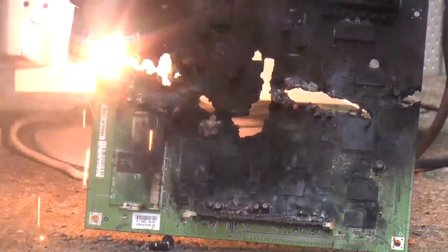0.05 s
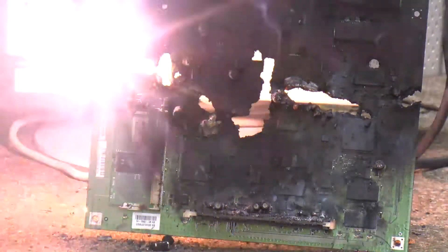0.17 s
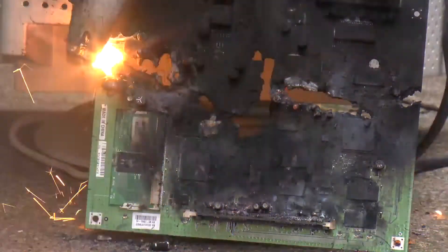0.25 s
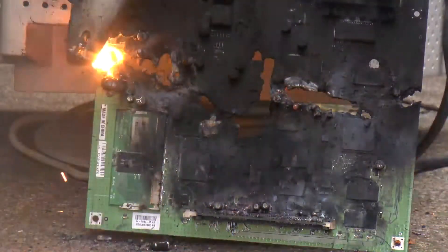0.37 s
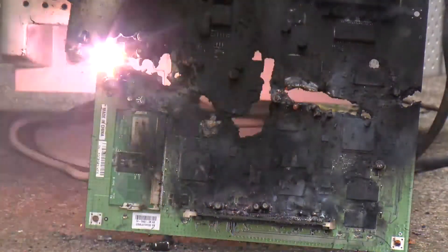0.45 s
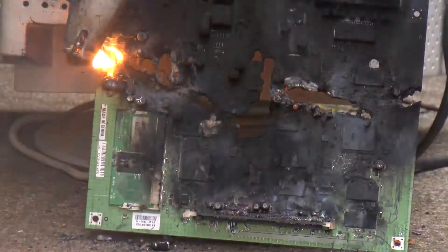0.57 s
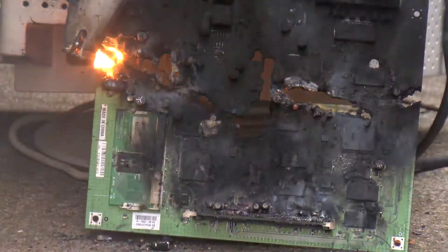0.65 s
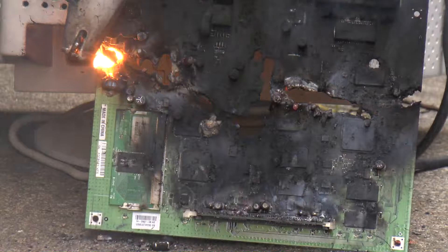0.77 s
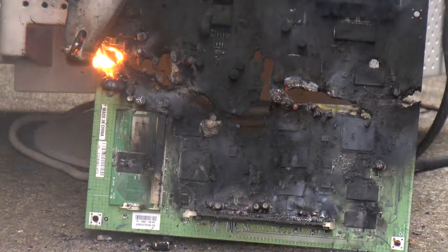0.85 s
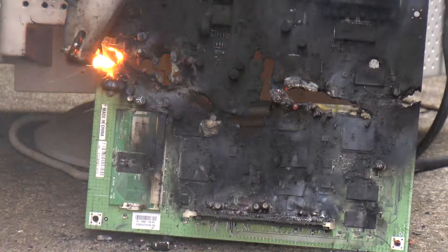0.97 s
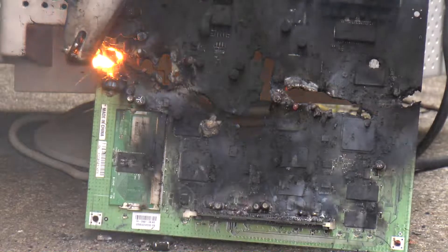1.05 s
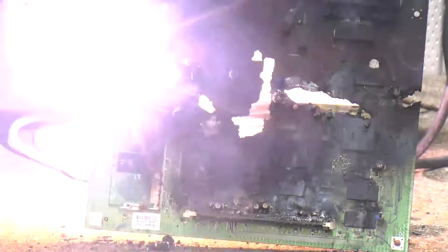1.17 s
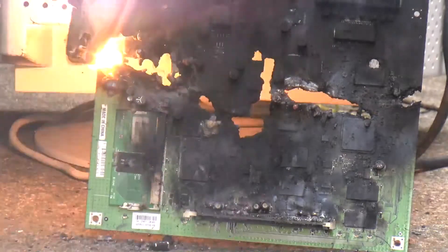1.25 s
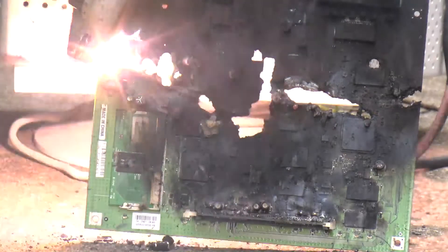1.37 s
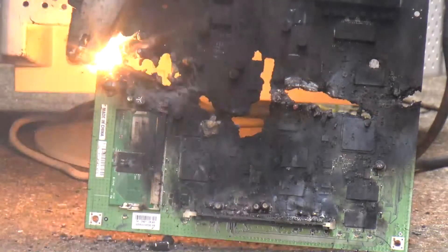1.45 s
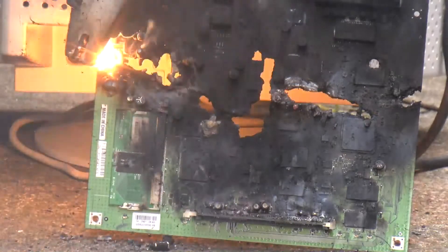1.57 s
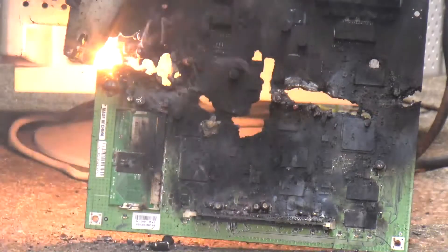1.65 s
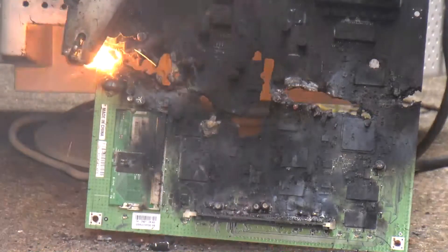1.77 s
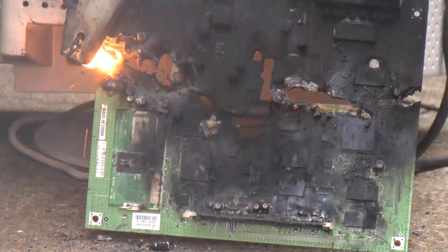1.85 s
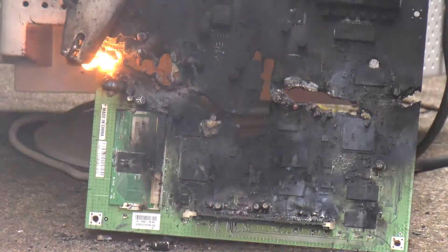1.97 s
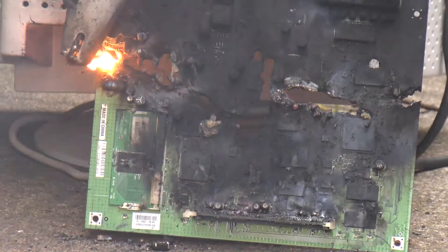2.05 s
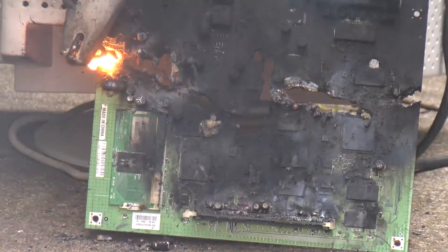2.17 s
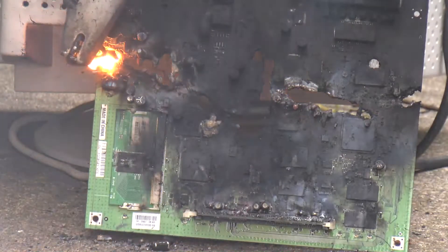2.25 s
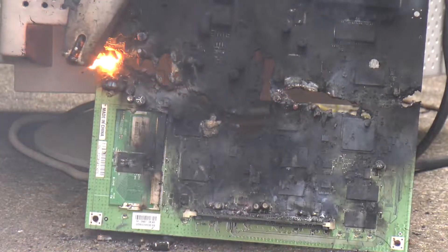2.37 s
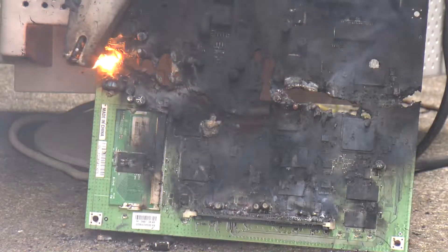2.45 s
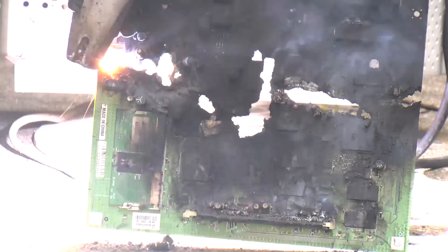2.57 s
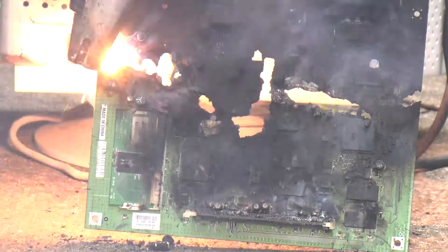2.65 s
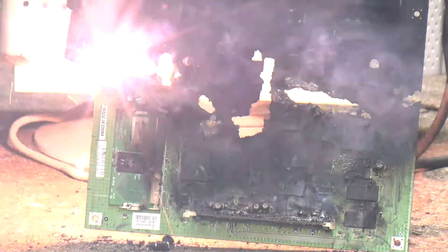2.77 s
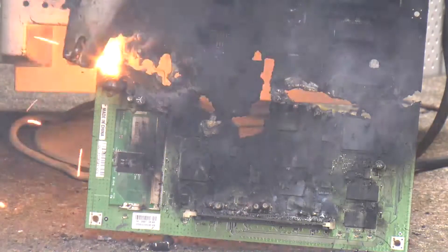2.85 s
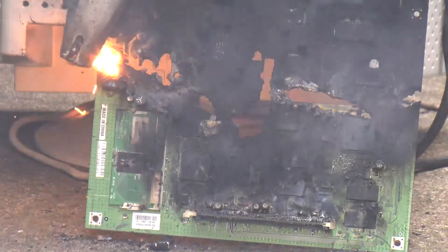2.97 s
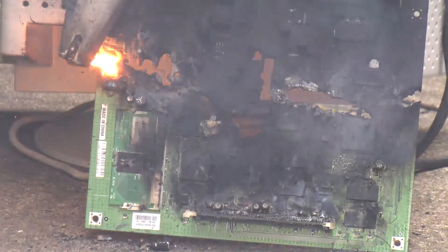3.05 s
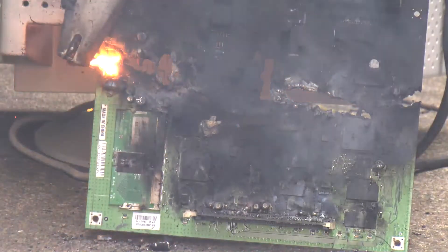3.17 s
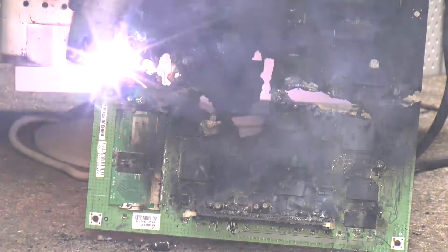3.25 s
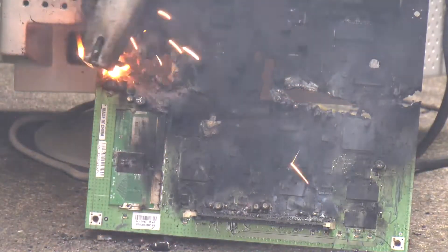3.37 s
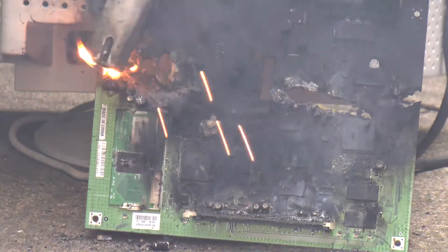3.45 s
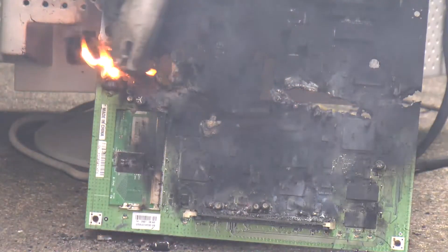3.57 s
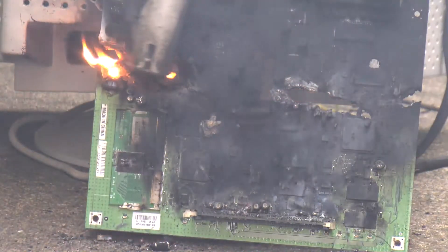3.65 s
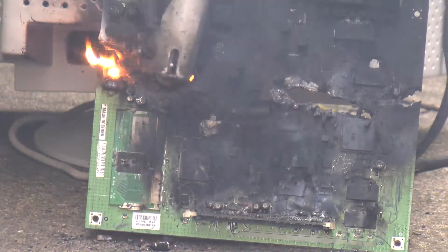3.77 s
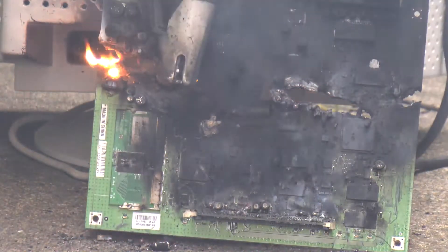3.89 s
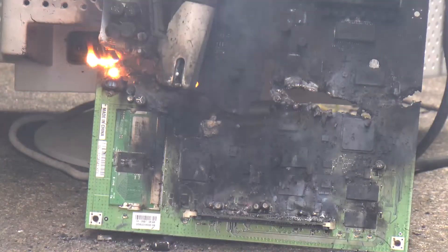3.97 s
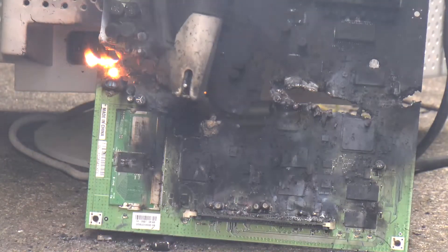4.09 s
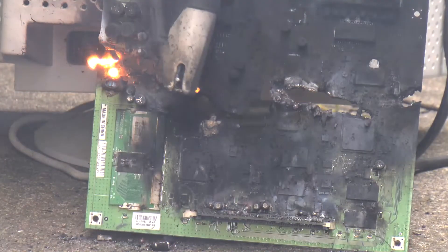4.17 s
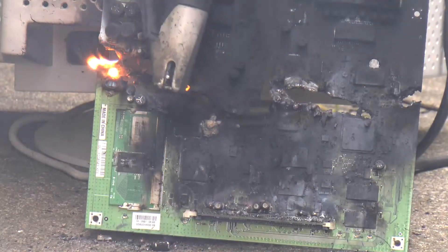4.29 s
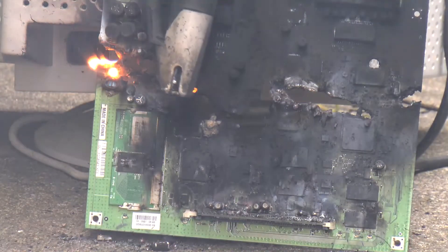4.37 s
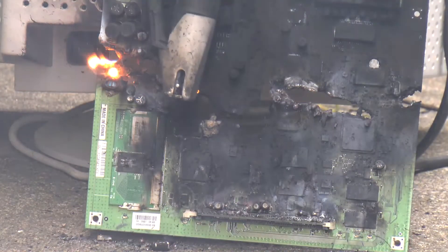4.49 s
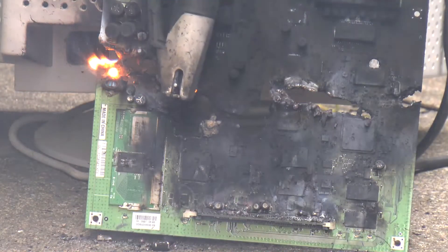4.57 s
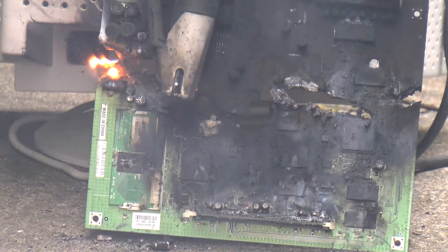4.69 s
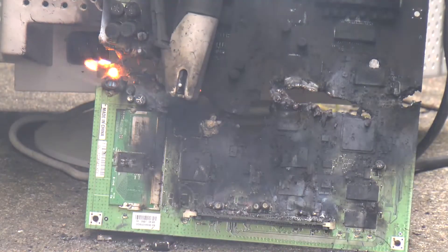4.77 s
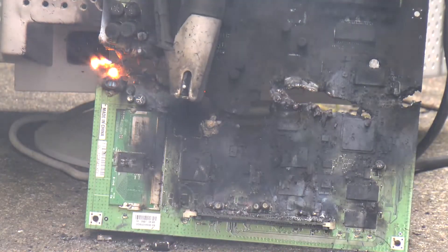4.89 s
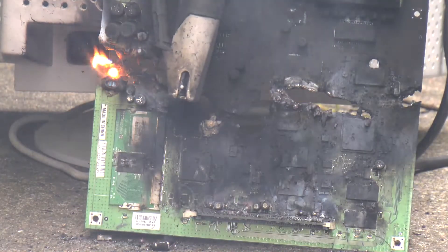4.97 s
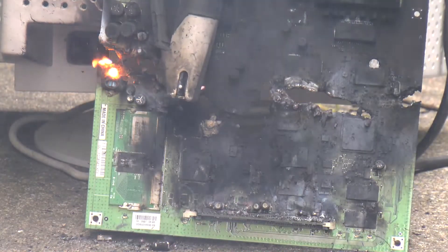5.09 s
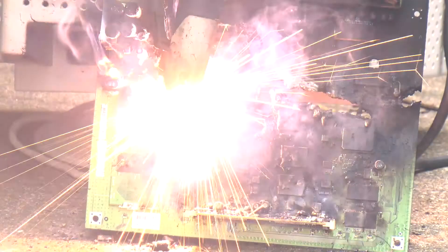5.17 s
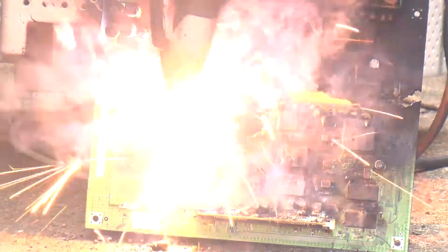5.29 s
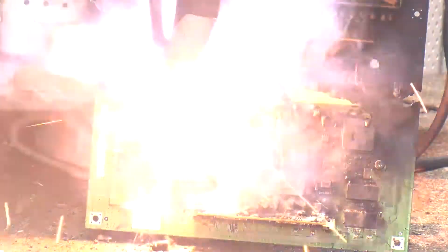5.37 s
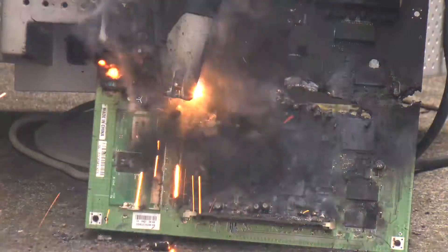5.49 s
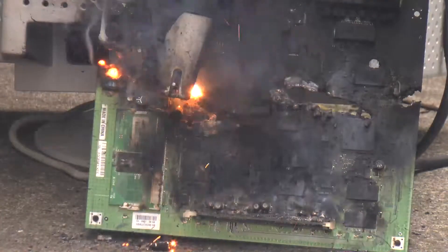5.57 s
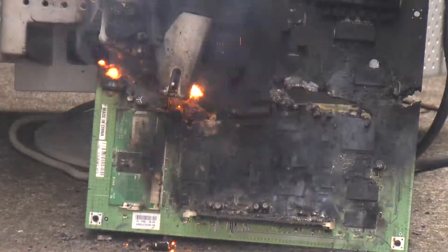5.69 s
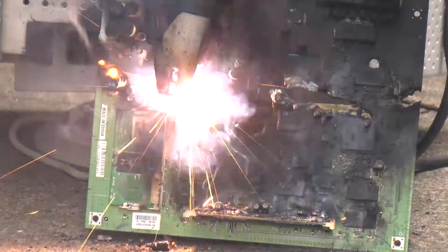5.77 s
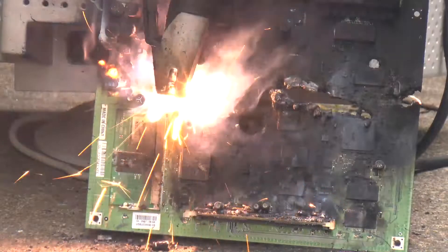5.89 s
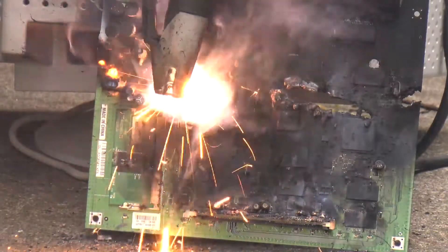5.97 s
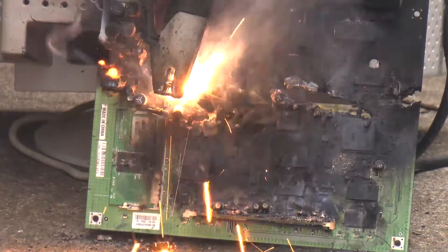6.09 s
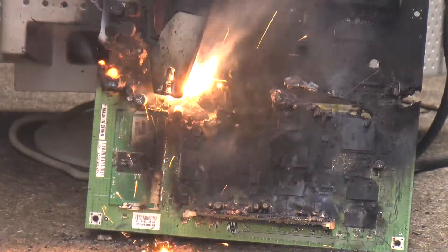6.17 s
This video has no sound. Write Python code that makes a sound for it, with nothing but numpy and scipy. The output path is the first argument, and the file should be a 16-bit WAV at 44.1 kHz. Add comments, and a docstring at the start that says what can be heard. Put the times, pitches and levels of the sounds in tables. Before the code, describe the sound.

Close stereo sound in a workshop with a short reverberant tail. Throughout, a fan rushes softly with a wavering transformer hum, faint whirr and the muffled rush of burning resin. At 0 s an electric arc cracks and buzzes for about 0.3 s, grainy and mains-pulsed; a small pop and tick follow near 0.4 s, then a faint high rising squeak. From 1.2 to 1.8 s it relights, sizzling and sputtering with moderate cracks. At 2.65 s a hard double crack starts another buzzing burst to 2.9 s; a sharp short snap hits at 3.3 s. A low drone swells from about 3 s and stays through the lull, with a small tick at 3.7 s and a tiny squeak at 5 s. The flame rush grows. At 5.2-5.5 s comes the loudest volley of cracks, thumps and metallic ringing, then another from 5.8 s to the end.

```python
"""A welding arc buzzes and sizzles close by in a workshop, burning into a circuit board in several bursts.
Relighting on each half cycle of the mains pulses its grainy noise and drives a buzz of harmonics.
Bursts of vapour crack as steep noise fronts, thump as short booms and set metal modes ringing.
Fan noise, transformer hum and a soft rush of burning resin run throughout; the hot board ticks, gas squeaks
as gliding tones, and a low drone swells in midway."""
import sys
import numpy as np
from scipy import signal
from scipy.fft import rfft, irfft, next_fast_len
from scipy.io import wavfile

SR = 44100
rng = np.random.default_rng(int(sys.argv[2]) if len(sys.argv) > 2 else 0)


def master_out(mix):
    """Clip the mix to full scale and print it as 16-bit PCM to the path in sys.argv[1]."""
    frames = np.transpose(np.atleast_2d(mix))
    ceiling = np.clip(frames, -1, 1)
    pcm = np.round(ceiling * 32767).astype(np.int16)
    wavfile.write(sys.argv[1], SR, pcm)


N = 274743
TIME = np.arange(N) / SR
STRIKE_HZ = 100  # the arc relights on each half cycle of the mains
SAG_DB_PER_S = 6  # the arc weakens as the electrode burns back

# The burns of the arc. Each row: start in seconds, length in seconds, relative sizzle level in dB,
# relative buzz level in dB, time for the sizzle to fall 60 dB in seconds.
BURNS = [(0, .3, -43.5, -38, 0.21), (1.187, 0.38, -46, -38.5, 0.7), (1.643, 0.125, -52.5, -49, 0.5),
         (2.645, .238, -50, -35.5, 1.08), (3.325, 0.02, -45, -41, 0.079), (5.24, 0.24, -39.5, -34.5, 0.11),
         (5.794, 0.47, -46.5, -39, .15)]
# The large bursts of vapour. Each row: start in seconds, relative crack level in dB,
# relative thump level in dB, treble tilt in dB.
VAPOUR_BURSTS = [(0.0109, -16.5, -24, 2.5), (0.391, -18, -24, 6.5), (1.24, -20, -28, 0),
                 (1.3102, -25.5, -39, 3), (1.3583, -38, -31.5, -3), (1.4487, -21, -27, -1.5),
                 (1.5078, -31, -25.5, -3), (1.7481, -23.5, -24.5, 8), (2.6465, -5.5, -18.5, -3),
                 (2.6581, -3.5, -15.5, -4.5), (2.7459, -23, -19.5, -3), (2.756, -14.5, -19, 0.5),
                 (2.866, -32, -30.5, -4), (3.3358, -5.5, -14.5, 4.5), (3.3452, -7.5, -23.5, 1),
                 (5.2322, -2, -12.5, -4.5), (5.241, -4, -41, -3.5), (5.252, -6.5, -16.5, -1),
                 (5.292, -10, -28, -7), (5.3021, -10.5, -21.5, -12), (5.3227, -19.5, -21, -19),
                 (5.353, -9, -17.5, 6), (5.4113, -9.5, -20, -1.5), (5.4221, -8.5, -20.5, -12.5),
                 (5.432, -6, -22, 5), (5.473, -10.5, -16, 2.5), (5.7916, -11.5, -21, 10),
                 (5.8105, -4, -18.5, -1), (5.8509, -11.5, -24, 7), (5.892, -13, -22.5, 6.5),
                 (5.9706, -16, -19, 0), (5.9801, -11.5, -23, -0.5), (6.0, -16, -21, -1),
                 (6.0306, -9.5, -21.5, 1.5)]


def gain_of(db):
    """Decibels to gain."""
    return 10 ** (np.asarray(db) / 20)


def evened(x):
    """Scaled to an rms of one."""
    return x / np.sqrt(np.mean(x ** 2) + 1e-20)


def unit(x):
    """Scaled to an energy of one."""
    return x / np.sqrt(np.sum(x ** 2) + 1e-20)


def read(points, hz):
    """A table's value, interpolated on a log-frequency axis."""
    f, value = np.transpose(points)
    return np.interp(np.log(hz + 1), np.log(f + 1), value)


def add(mix, s, sound):
    """Mixes a sound in at time s, cut at the end of the mix."""
    part = mix[..., max(round(s * SR), 0):][..., :sound.shape[-1]]
    part += sound[..., :part.shape[-1]]


def colour(x, spectrum):
    """A causal minimum-phase filter with the given spectrum, so that attacks stay sharp."""
    hz = abs(np.fft.fftfreq(4096, 1 / SR))
    log_gain = np.log(gain_of(np.maximum(read(spectrum, hz), -100)))
    response = np.exp(np.conj(signal.hilbert(log_gain)))
    taps = np.fft.ifft(response).real[:2048]
    return signal.oaconvolve(x, taps)[:len(x)]


def wander(hz):
    """Slow chance of unit rms: noise rolled off above the given rate."""
    size = next_fast_len(N, real=True)
    rolloff = 1 + (np.fft.rfftfreq(size, 1 / SR) / hz) ** 4
    return evened(irfft(rfft(rng.standard_normal(size)) / rolloff, size)[:N])


def wide_noise(spectrum):
    """Noise from all around, as two microphone ports hear it: partly alike, band by band."""
    # Each row: frequency in Hz, likeness of left and right from 0 to 1.
    likeness = [(60, 0.66), (130, 0.8), (290, 0.62), (640, 0.52), (1410, 0.29), (3100, 0.84), (6820, 1),
                (15000, 0.14)]
    hz = np.fft.rfftfreq(N, 1 / SR)
    mid, side = rfft(rng.standard_normal((2, N)))
    same = np.clip(read(likeness, hz), -1, 1)
    mid, side = mid * np.sqrt(1 + same), side * np.sqrt(1 - same)
    ports = np.array([mid + side, mid - side])
    return evened(irfft(ports * gain_of(read(spectrum, hz)), N))


def envelope(start, length, rise_s, fade_s):
    """Attack, hold and a release that falls 60 dB in fade_s."""
    t = TIME - start
    release_db = -60 * np.maximum(t - length, 0) / fade_s
    return np.clip(t / rise_s, 0, 1) * gain_of(release_db)


def arc_strength(ignite_s=0.0017, buzz_out_s=0.042, spatter_db=-21, spatter_fade_db_per_s=435):
    """Gains of sizzle and buzz: each burn lights, sags and goes out; each large burst adds spatter."""
    sizzle_power, buzz = np.zeros(N), np.zeros(N)
    for start, length, sizzle_db, buzz_db, fade_s in BURNS:
        sag_db = SAG_DB_PER_S * np.clip(TIME - start, 0, length)
        sizzle = gain_of(sizzle_db - sag_db) * envelope(start, length, ignite_s, fade_s)
        sizzle_power += sizzle ** 2
        buzz += gain_of(buzz_db - sag_db) * envelope(start, length, ignite_s, buzz_out_s)
    t = np.arange(SR // 2) / SR
    for s, crack_db, _, _ in VAPOUR_BURSTS:
        # the sizzle flares, in proportion to the burst's crack
        flare = np.minimum(t / ignite_s, 1) * gain_of(crack_db + spatter_db - spatter_fade_db_per_s * t)
        add(sizzle_power, s, flare ** 2)
    return np.sqrt(sizzle_power), buzz


def arc(sizzle_db=-2, buzz_db=-1, pulsing=0.22, grain_db=5.5, flicker_db=1.5, waver_db=2.2,
        strike_s=0.00184, boom_lag_s=0.00516):
    """The plasma sizzles in grains on every half cycle, and its heat pulses the air into a buzz."""
    # The sizzle's spectrum. Each row: frequency in Hz, level in dB per Hz.
    sizzle_spectrum = [(530, -16.5), (900, -19), (1100, 0), (1320, -9), (1950, -2), (2280, -7),
                       (2900, -1.5), (4180, -4.5), (5600, -1.5), (7500, -9.5), (8050, -10), (14300, -19),
                       (15500, -14)]
    # The buzz's harmonics. Each row: multiple of the strike rate, relative level in dB.
    harmonics = [(1, -9), (2, -1), (3, -7), (4, -9)]
    sizzle_gain, buzz_gain = arc_strength()
    turns = STRIKE_HZ * (TIME - strike_s) + 0.03 * wander(34)  # cycles, slightly unsteady
    grain_size = np.minimum(rng.exponential(1, N), 4.5)
    grains = rng.standard_normal(N) * gain_of(grain_db * grain_size)
    grains *= 1 + pulsing * np.cos(2 * np.pi * turns)
    grains *= gain_of(flicker_db * wander(57))
    sizzle = evened(colour(grains, sizzle_spectrum)) * sizzle_gain
    pulse = 2 * np.pi * (turns - STRIKE_HZ * boom_lag_s)
    buzz = sum(gain_of(db + waver_db * wander(45)) * np.cos(round(k) * pulse) for k, db in harmonics)
    return gain_of(sizzle_db) * sizzle, gain_of(buzz_db) * evened(buzz) * buzz_gain


def welder(fan_db=-43.5, hum_hz=399.7, hum_db=-53, whirr_hz=236, whirr_db=-54,
           drone_hz=54, drone_db=-55.0, drone_waver_db=2, drone_start_s=2.95, drone_rise_s=0.52):
    """The fan rushes and whirrs over a wavering transformer hum; a low drone swells in and stays."""
    # The fan's rush of air. Each row: frequency in Hz, level in dB per Hz.
    fan_spectrum = [(25, -20), (50, -15), (90, -5), (160, -5.5), (250, -1.5), (400, -7), (590, -12.5),
                    (790, -6.5), (1320, -22.5), (2000, -21), (3200, -23.5), (6000, -33.5), (9000, -42),
                    (14000, -43)]
    hum_tone = np.sin(2 * np.pi * hum_hz * TIME + 0.14 * wander(24.0))
    hum = gain_of(hum_db + 2 * wander(13.0)) * evened(hum_tone)
    whirr_tone = wander(9.1) * np.sin(2 * np.pi * whirr_hz * TIME + wander(2.6))
    whirr = gain_of(whirr_db) * evened(whirr_tone)
    swell = np.clip((TIME - drone_start_s) / drone_rise_s, 0, 1)
    swell = swell * gain_of(drone_db + drone_waver_db * wander(1.8))
    drone = swell * evened(np.sin(2 * np.pi * drone_hz * TIME + 2.5 * wander(5.4)))
    fan = gain_of(fan_db + .5 * wander(35)) * wide_noise(fan_spectrum)
    return fan + hum + whirr + drone


def flame(flicker_db=0.9):
    """The burning resin rushes softly as broad noise, louder and softer as the fire spreads and sinks."""
    # The fire on the board. Each row: time in seconds, level of the rush in dB.
    fire = [(0.0, -49), (1.15, -51), (1.4, -48), (2.5, -52.5), (2.9, -49.5), (5.1, -44), (6.23, -46)]
    # The rush's spectrum. Each row: frequency in Hz, level in dB per Hz.
    rush_spectrum = [(150, -6), (300, 11.5), (500, 6), (800, 7), (1300, 5), (2200, -2), (3300, -12),
                     (5000, -30), (9000, -39)]
    level_db = np.interp(TIME, *np.transpose(fire)) + flicker_db * wander(15)
    return gain_of(level_db) * wide_noise(rush_spectrum)


def crack(front=0.39, ragged_db=3.5, rise_s=.00065):
    """A steep front followed by a ragged spray that swells and dies within a few milliseconds."""
    # The crack's spectrum. Each row: frequency in Hz, level in dB per Hz.
    crack_spectrum = [(180, -15), (450, 0), (780, -1), (1150, 4), (1600, -6), (2400, -0.5), (3300, -2),
                      (4300, -4), (5600, -1.5), (7500, -10.5), (11000, -17.5), (15500, -16)]
    u = np.arange(4096) / SR / rise_s
    ragged = rng.standard_normal(len(u)) * gain_of(ragged_db * rng.standard_normal(len(u)))
    spray = unit(ragged * u * np.exp(-u))
    spray[0] += front
    return unit(colour(spray, crack_spectrum))


def sputter(per_s=13, spread_db=3, crack_db=15.5, thump_db=3):
    """Small bursts of vapour at chance strikes of the arc, as rows like the large ones."""
    rows = []
    for start, length, sizzle_db, buzz_db, _ in BURNS:
        count = int(length * per_s)
        for k, (place, a, b) in enumerate(rng.uniform(-1, 1, (12, 3))[:count]):
            s = start + length * (k + .5 + place / 2) / count
            s = round(s * STRIKE_HZ) / STRIKE_HZ  # onto the grid of strikes
            sag_db = SAG_DB_PER_S * (s - start)
            # levels follow the sizzle and the buzz of that burn
            rows.append((s, sizzle_db - sag_db + crack_db + spread_db * a,
                         buzz_db - sag_db + thump_db + spread_db * b, 0))
    return rows


def pops(crack_db=8, thump_db=7, boom_delay_s=0.00547):
    """Each burst of vapour cracks, pushes the air into a boom and sets the metal ringing."""
    # The air around the bench booms. Each row: frequency in Hz, rise in seconds, relative level in dB.
    air_modes = [(114.3, 0.0097, -18.5), (198, 0.0076, -6.5), (358.6, 0.0022, -12)]
    # Metal of torch and board. Each row: frequency in Hz, time to fall 60 dB in seconds,
    # relative level in dB.
    metal_modes = [(1970, 0.093, -4.5), (2170, 0.088, 5), (2433, 0.13, -2), (2590, 0.19, -6),
                   (3225, 0.037, 8), (3340, 0.065, 6), (4030, 0.052, -9), (5330, 0.078, -5),
                   (5400, .07, -17), (5825, .09, -10), (8000, 0.15, -10)]
    # The torch moves to a spot where bare metal rings. Each row: time in seconds, ring in dB against the crack.
    contact = [(3.4, -35), (5.2, -2)]
    # A larger blast has more middle and booms less deep. Each row: relative crack level in dB, # body in dB,
    # deep bass in dB.
    blast_size = [(-6, -1, -0.5), (-12, -4.5, 3)]
    cracks, thumps = np.zeros((2, N)), np.zeros(N)
    t = np.arange(SR // 5) / SR
    boom = np.zeros(len(t))
    for hz, rise, db in air_modes:
        swell = (t / rise) ** 2 * np.exp(2 - 2 * t / rise)
        boom += gain_of(db) * swell * np.cos(2 * np.pi * hz * (t - boom_delay_s))
    size, body, depth = np.transpose(blast_size)
    for s, db, push_db, treble_db in VAPOUR_BURSTS + sputter():
        tilt = [(1000, np.interp(db, size, body)), (2000, 0), (3500, 0), (6000, treble_db)]
        blast = colour(crack(), tilt)
        ring = sum(gain_of(mode_db - 60 * t / t60) * np.sin(2 * np.pi * (hz * t + rng.random()))
                   for hz, t60, mode_db in metal_modes)
        ring_db = np.interp(s, *np.transpose(contact))
        add(cracks, s, gain_of(db + crack_db) * bench(unit(blast)))
        add(cracks, s, gain_of(db + crack_db + ring_db) * unit(ring))
        bass = [(100, np.interp(db, size, depth)), (180, 0)]
        add(thumps, s, gain_of(push_db + thump_db) * colour(boom, bass))
    return cracks, thumps


def snaps(snap_db=2):
    """The charred board splits with small ticks: cracks with less low end."""
    # Small snaps of the hot board. Each row: start in seconds, relative level in dB.
    ticks = [(0.3797, -26.5), (3.314, -23), (3.6644, -29.5), (5.172, -33)]
    out = np.zeros(N)
    for s, db in ticks:
        tick = unit(colour(crack(), [(2000, -10), (6000, -3)]))
        add(out, s, gain_of(db + snap_db) * tick)
    return out


def squeaks(flutter_hz=230, sputter_db=4.0):
    """Gas whistles unsteadily through pores in the resin, as fluttering, gliding tones."""
    # Each row: start in seconds, length in seconds, first pitch in Hz, last pitch in Hz, relative level in dB.
    whistles = [(0.444, 0.095, 5280, 6210, -52.5), (5.036, 0.067, 6380, 6300, -53.5)]
    out, flutter = np.zeros(N), flutter_hz * wander(300)
    for s, length, first_hz, last_hz, db in whistles:
        u = np.clip((TIME - s) / length, 0, 1)
        hz = first_hz + (last_hz - first_hz) * u + flutter
        tone = np.sin(2 * np.pi * np.cumsum(hz) / SR)
        out += gain_of(db) * np.sin(np.pi * u) * tone
    return out * gain_of(sputter_db * wander(120))


def bench(x, scatter_db=-4, scatter_s=0.0089, side_db=-1):
    """Direct sound, smeared reflections and quick scatter off the cluttered bench, drawn anew each time."""
    # Reflections. Each row: delay in milliseconds, spread in milliseconds, relative level in dB.
    echoes = [(1.6, 1.4, -3.5), (6.8, 2.55, -3)]
    # Stereo width. Each row: frequency in Hz, side against mid in dB.
    side_spectrum = [(60, -33), (110, -15), (200, -31), (380, 1), (700, -9), (1290, -9.5), (2380, -5),
                     (4400, -28), (8120, -4.5), (15000, -7)]
    t = np.arange(3072) / SR
    shape = np.exp(-t / scatter_s) * (1 - np.exp(-t / 0.005))
    scatter = [unit(z * shape) for z in rng.standard_normal((2, len(t)))]
    paths = gain_of(scatter_db) * np.array(scatter)
    for delay_ms, spread_ms, db in echoes:
        for path in paths:
            smear = unit(rng.standard_normal(len(t)) * np.exp(-1000 * t / spread_ms))
            add(path, delay_ms / 1000, gain_of(db) * smear)
    mid = paths[0] + (t == 0)  # the direct sound is a single impulse
    side = gain_of(side_db) * np.linalg.norm(mid) * colour(unit(paths[1]), side_spectrum)
    return signal.oaconvolve(x[None], np.array([mid + side, mid - side]), axes=1)[:, :N]


def restless(x, turn_hz=11, count=3):
    """The arc's root wanders over the board: the sound fades among several sets of reflections."""
    turn = np.pi * (turn_hz * TIME + 0.35 * wander(8.7))
    spots = [bench(x * np.sin(turn + np.pi * k / count)) for k in range(count)]
    return sum(spots) * np.sqrt(2 / count)


def workshop(x, room_db, width):
    """The tail of the room, each band dying at its own speed, a little different at each port."""
    # Each row: frequency in Hz, time to fall 60 dB in seconds.
    decay = [(150, 0.64), (500, 0.48), (2500, 0.5), (6000, 0.38), (14000, 0.22)]
    hz, s, z = signal.stft(rng.standard_normal((2, SR * 3 // 5)), SR, nperseg=256)
    z *= gain_of(-60 * s / read(decay, hz)[:, None]) * (1 - np.exp(-s / 0.0011))
    mid, side = signal.istft(z, SR, nperseg=256)[1]
    tails = np.array([unit(mid + width * side), unit(mid - width * side)])
    reverb = signal.fftconvolve(x.mean(0)[None], tails, axes=1)[:, :N]
    return x + gain_of(room_db) * reverb


def scene():
    """Arc and bursts sound through bench and workshop, over the running welder and the fire."""
    background = welder() + flame()
    sizzle, buzz = arc()
    hiss = restless(sizzle + snaps() + squeaks())
    cracks, thumps = pops()
    sharp = workshop(cracks + hiss, room_db=-16, width=0.31)
    low = workshop(np.array([thumps + buzz] * 2), room_db=-19, width=0.5)
    # both leaning slightly to the right
    return (sharp + low) * gain_of([[-.55], [.55]]) + background * gain_of([[-.2], [.2]])


def record(dry, low_cut_hz=42, hiss_db=-64, edge_hz=15700):
    """The microphone sheds the deepest bass and adds its own faint hiss; then the band limit."""
    low_cut = signal.butter(2, low_cut_hz, "highpass", fs=SR, output="sos")
    thinned = signal.sosfilt(low_cut, dry)
    thinned = thinned + gain_of(hiss_db) * wide_noise([(1000, 0), (16000, 0)])
    band_limit = signal.firwin(255, edge_hz, window=("kaiser", 9), fs=SR)
    return signal.oaconvolve(thinned, band_limit[None], "same")


dry = scene()
out = record(dry)
master_out(out)
```